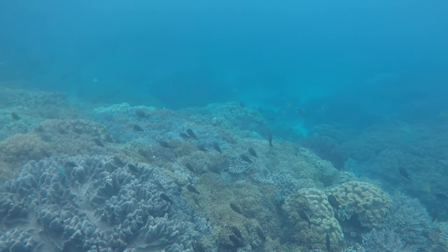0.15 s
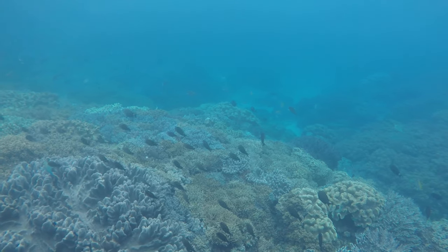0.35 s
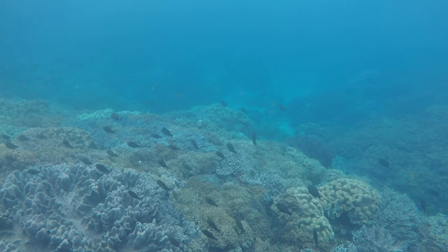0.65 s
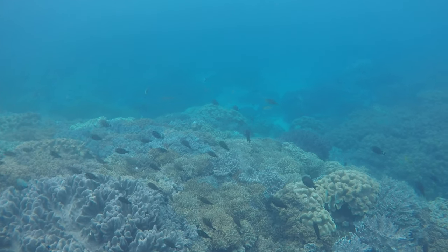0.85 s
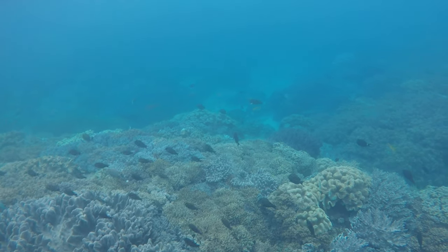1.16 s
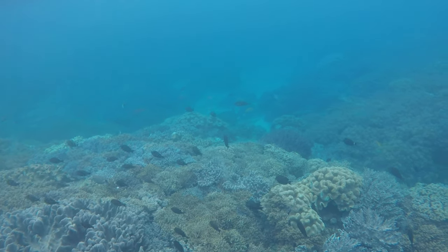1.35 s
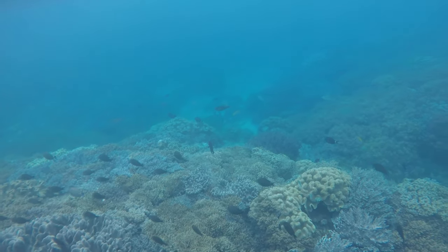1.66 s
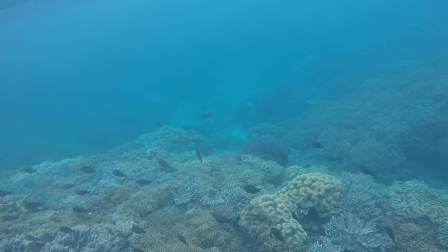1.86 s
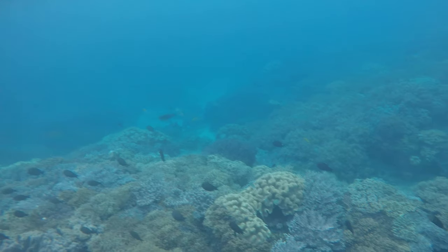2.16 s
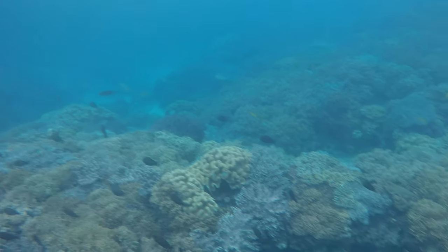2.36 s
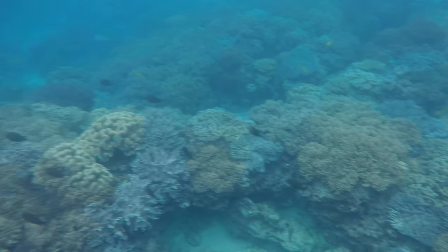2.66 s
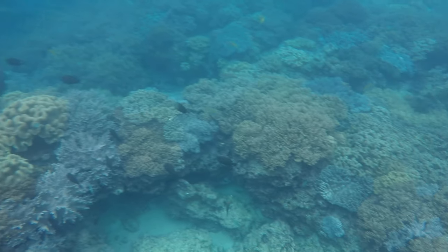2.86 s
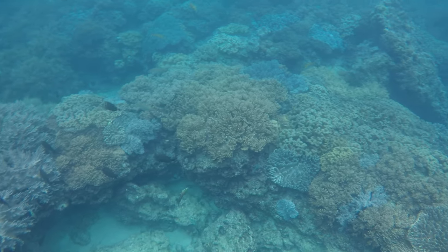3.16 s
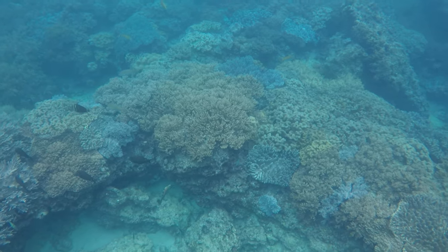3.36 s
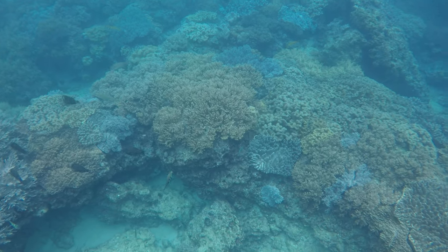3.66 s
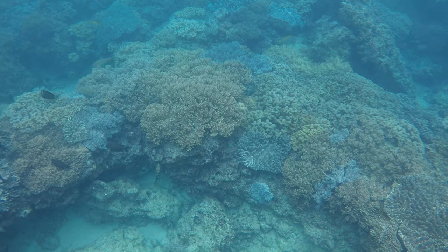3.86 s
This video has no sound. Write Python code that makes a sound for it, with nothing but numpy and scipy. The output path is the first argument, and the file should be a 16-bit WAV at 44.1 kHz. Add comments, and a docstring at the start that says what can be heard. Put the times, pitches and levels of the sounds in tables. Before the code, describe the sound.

Water knocks dully on an underwater camera housing above a coral reef. Quiet hiss, fine shrimp crackle and sharper ticks run throughout. A faint creak comes at 0.1 seconds, soft knocks and slosh around 0.6-0.8. Bass opens near 0.9; knocks, blips, thumps and fizz cluster at 1.1-1.3. After a calmer stretch, a clack at 2.28 precedes hard knocks at 2.35, 3.06 and 3.32, then creaks at 3.74 and 3.9.

```python
"""Four seconds under water by a coral reef, heard by two microphones in a waterproof camera housing.
From the start, shaped noise makes a hiss, far crackle, sloshing and surge rumble; near shrimp tick on top.
An early creak is made of tiny slips. The deep bass opens just before one second; then come strong knocks that
ring the housing, short pitched blips, low thumps and a run of quick knocks. Past two seconds a dull clack rings,
then the hardest knocks follow, with puffs of fizz in the wash. Two more creaks come near the end."""
import sys
import numpy as np
from scipy import signal
from scipy.fft import rfft, irfft
from scipy.io import wavfile

SR = 44100
rng = np.random.default_rng(int(sys.argv[2]) if len(sys.argv) > 2 else 0)


def bounce(signal):
    """Save signal as a 16-bit WAV file at the path given by the first command-line argument."""
    frames = np.transpose(np.atleast_2d(signal))
    limited = np.clip(frames, -1, 1)
    pcm = np.round(limited * 32767).astype(np.int16)
    wavfile.write(sys.argv[1], SR, pcm)


N = 176400
T = np.arange(N) / SR  # time in seconds
OPPOSITE = np.array([[1], [-1]])  # left and right move in opposite directions

# Snaps of near shrimp. Columns: t/s, peak level before balance/dB, relative low ring level/dB,
# relative bright ring level/dB, left minus right balance/dB
NEAR_SNAPS = [(0.2853, -16.5, -9, -3.5, 1), (0.5723, -37.5, 3, 1, 1), (0.585, -28.5, 5, 3, -4),
              (0.8923, -34.5, -14, 1, -2), (0.9338, -29, -15, 2, 1), (0.9784, -26, -12, 9, 0),
              (1.3914, -40, 0, -10.5, -14.5), (1.463, -34, -20, 3, 1), (1.527, -37, -4, -6, 1),
              (1.856, -25, -6.5, 1, 1), (1.8983, -32, -3, 3.5, 1), (2.085, -32.5, -4, -1, 1),
              (2.631, -32.5, -1, -8, 4), (2.6768, -34.5, 4, -7, 8.5), (2.8677, -28.5, 8, 11.5, 0.5),
              (2.994, -30, 1.5, 0.5, 1), (3.2045, -35, -2, -1, 2), (3.296, -23.5, 2.5, -0.5, 0),
              (3.3985, -32, -10, -2, 2), (3.413, -30, -1.5, 0.5, 1), (3.4456, -30.5, -13, -3, 2),
              (3.745, -35.5, -4, 1, 2), (3.7677, -31.5, 4, 5.5, 0), (3.9718, -26.5, 3, 0, 2)]
# The two groups of housing resonances that a snap rings. Columns: f/Hz, relative level/dB
SNAP_LOW_COLOUR = [(700, -62), (1350, -14), (1780, 8.5), (2200, -7), (2850, -4.5), (3700, -3),
                   (4400, -23.5), (9000, -68.5)]
SNAP_BRIGHT_COLOUR = [(1500, -20), (3500, -16), (4300, -12.5), (5250, 7.5), (6300, 2.5), (7100, 6),
                      (7900, -6), (10500, -21), (15000, -28)]
SNAP_LAG_S = 0.00045  # greatest delay between the microphones
SNAP_SCATTER_S, SNAP_SCATTER_DB = 0.0021, -13  # early scattering: time constant, starting level
REEF_ECHO_S, REEF_ECHO_DB = 0.005, -24  # longer, fainter scattering

# Ringing tones of one dull clack. Columns: f/Hz, time to fall by 60 dB/s, relative level/dB
CLACK_TONES = [(1786, 0.023, 5), (2170, .008, -8), (2800, 0.018, -6.5)]
CLACK_S, CLACK_DB, CLACK_PAN_DB = 2.283, -21, 5  # start, peak before balance, left minus right

# Knocks of water on the housing. Columns: t/s, peak level before balance/dB, push brightness f/Hz,
# rocking level relative to squeezing/dB, left minus right balance/dB
WATER_KNOCKS = [(0.079, -22.5, 560, 0.5, -3.5), (0.607, -25.5, 494, -4, -5), (0.622, -27, 450, -2.5, -3),
                (.665, -22, 445, -15, -5), (0.803, -17.5, 152, 7, 13), (1.146, -11.5, 323, 3.5, 2),
                (1.161, -14.5, 600, -6, 3.5), (1.195, -15, 130, -2.5, -5.5), (1.295, -21.5, 600, 5, 6.5),
                (2.3455, -7, 320, 5, 4.5), (2.439, -14, 770, 2, -1.5), (2.927, -15.5, 400, 7, 6),
                (3.0589, -6.5, 850, 0, 0), (3.213, -13.5, 392, 0, -2.5), (3.319, -5, 152, 0.5, 3.5)]
KNOCK_RATTLE_S, KNOCK_RATTLE_DB = 0.007, -32  # time constant, starting level against the first contact
# Housing tones: squeezing moves both microphones together, rocking moves them oppositely.
# Columns: f/Hz, time to fall by 60 dB/s, relative level/dB
SQUEEZE_TONES = [(168, 0.025, 3), (197, 0.016, 9.5), (399, 0.026, 1), (600, 0.015, -10), (1164, 0.03, -9),
                 (1800, 0.0043, -0.5)]
ROCK_TONES = [(177, 0.024, 5), (576, 0.026, 5.5), (722, 0.011, 5), (920, 0.02, -2), (1060, 0.022, -1),
              (1336, 0.039, -4)]

# Short pitched blips, some ringing with a knock, some perhaps bubbles. Columns: t/s, f/Hz, peak level/dB
TONE_BLIPS = [(1.127, 430, -13), (1.144, 453, -20), (1.162, 940, -24), (2.344, 543, -15.5),
              (2.437, 567, -23), (2.928, 580, -27), (3.209, 875, -31)]
BLIP_ATTACK_S, BLIP_DECAY_S, BLIP_SQUEEZE = 0.0025, 0.0063, 0.31  # last: share of squeezing as a gain

# Stick-slip creaks, probably the grip, and at 1.218 s a run of quick knocks on the housing.
# Columns: t/s, length/s, contact rate at the start/Hz, contact rate at the end/Hz, peak level/dB
CONTACT_RUNS = [(.1, 0.12, 221, 115, -29), (0.789, 0.094, 115, 320, -31.5), (1.218, .12, 80, 45, -24.5),
                (3.738, 0.105, 60, 34, -26), (3.909, 0.095, 51, 98, -28)]
CONTACT_HZ, CONTACT_ROCK_DB = 400, -0.5  # brightness of each contact, rocking against squeezing
CONTACT_JITTER, CONTACT_SPREAD_DB = 0.035, 3  # spread of timing (log ratio) and of strength

# Thumps of moving water. Columns: t/s, peak level/dB, f/Hz
WATER_THUMPS = [(1.106, -17.5, 40), (1.132, -23.5, 52.4), (1.975, -28, 40.7), (2.347, -27, 50.7),
                (2.619, -32, 43.4), (3.3106, -19, 59), (3.328, -18.5, 43.6)]
THUMP_ATTACK_S, THUMP_DECAY_S = 0.0055, 0.016

# Rise and fall of water sloshing past the housing. Columns: t/s, relative level/dB
SLOSH_LEVEL = [(0, -57), (.085, -48), (.21, -53.5), (.28, -56.5), (.39, -50), (.56, -55), (.605, -41),
               (.69, -40), (.745, -54.5), (.85, -46.5), (.97, -44), (1.07, -47), (1.16, -32), (1.21, -42.5),
               (1.37, -57), (1.6, -57), (1.8, -50), (1.9, -55.5), (2.01, -49), (2.14, -59), (2.25, -48.5),
               (2.4, -56), (2.46, -48), (2.58, -47.5), (2.72, -55.5), (2.89, -48.5), (2.94, -35),
               (3.01, -53), (3.075, -34.5), (3.12, -44.5), (3.2, -40), (3.26, -48.5), (3.32, -38.5),
               (3.38, -55), (3.71, -55.5), (3.77, -45.5), (3.89, -56), (4, -44)]
# Tone colour of the squeezing and rocking parts of the slosh. Columns: f/Hz, relative level/dB
SLOSH_SQUEEZE_COLOUR = [(90, -38), (125, -2.5), (170, 3.5), (250, 2), (420, -3.5), (520, -7.5),
                        (750, -16.5), (1200, -19.5), (1800, -30), (9000, -62.5)]
SLOSH_ROCK_COLOUR = [(90, -19), (160, 3), (260, -3), (380, -10), (520, -3), (700, -6.5), (980, -7.5),
                     (1200, -13.5), (1800, -26.5), (9000, -75)]
SLOSH_PER_S, SLOSH_SPREAD_DB = 900, 2.5
SQUEEZE_DB, ROCK_DB = 2.5, 7.5  # levels of the two parts before the rise and fall

# Puffs of fine fizz. Columns: t of the middle/s, swell width (standard deviation)/s,
# level before the top is cut/dB, top f/Hz
FIZZ_PUFFS = [(0.66, 0.019, -51, 1840), (0.869, 0.0068, -43, 2450), (0.96, 0.026, -52.5, 2540),
              (1.154, 0.022, -42.5, 2900), (2.014, 0.04, -48, 2400), (2.57, 0.022, -42.5, 1280),
              (3.076, 0.012, -38, 1880), (3.164, 0.027, -47, 2600), (3.322, 0.0044, -38, 3200)]
# Tone colour of the fizz. Columns: f/Hz, relative level/dB
FIZZ_TONE = [(500, -12.5), (900, -4), (1300, 4.5), (1800, -2.5), (2800, -0.5), (4200, -13)]
FIZZ_PER_S, FIZZ_SPREAD_DB = 700, -1

# Tone colour of the far shrimp and of the hiss they merge into. Columns: f/Hz, relative level/dB
FAR_CRACKLE_COLOUR = [(900, -28), (1750, -2.5), (2500, -8), (4300, -17.5), (5250, 0.5), (6300, -3.5),
                      (7000, -2), (8000, -12), (15000, -23)]
FAR_HISS_COLOUR = [(90, -34), (150, 2.5), (400, 9), (800, 6.5), (1800, 3), (3000, 0.5), (4300, -2.5),
                   (7000, 1), (7900, -2), (10000, -3.5), (12500, -14), (15000, -30)]
CRACKLE_PER_S, CRACKLE_SPREAD_DB = 160, 4.5
CRACKLE_DB, HISS_DB = -57.5, -54.5

# Rise and fall of the low surge rumble. Columns: t/s, relative level/dB
RUMBLE_LEVEL = [(0, -38), (.92, -49), (1.07, -47), (1.14, -30), (1.25, -39), (1.45, -46.5), (1.7, -41.5),
                (2.02, -37), (2.13, -44), (2.26, -39), (2.5, -41.5), (2.65, -39), (2.85, -43.5),
                (3.45, -45), (3.88, -47.5), (4, -35)]
# Tone colour of the rumble. Columns: f/Hz, relative level/dB
RUMBLE_TONE = [(12, -14.5), (25, -3), (50, 3), (75, -2), (110, -8), (170, -16), (300, -28), (700, -68)]
RUMBLE_SIDE_DB = -7.5  # gain of the part that differs between left and right

LOW_CUT_HZ, BASS_OPENS_S, BASS_FADE_S = 145.3, 0.874, 0.083  # the low cut, when it lets go, how long it takes
TOP_HZ = 15100  # top of the treble


def undb(db):
    """Turn decibels into a gain."""
    return 10 ** (np.asarray(db) / 20)


def level(x, db):
    """Scale a sound to a chosen rms (root of average power) level."""
    return x * undb(db) / np.sqrt(np.mean(x ** 2))


def curve(rows):
    """Draw a gain over time through points of time and decibels."""
    times, levels = np.array(rows).T
    return undb(np.interp(T, times, levels))


def colour(x, rows):
    """Filter a sound through points of frequency and decibels, with no sound before its cause."""
    hz, db = np.array(rows).T
    n = x.shape[-1]
    f = np.maximum(np.fft.rfftfreq(n, 1 / SR), 1)
    gain_db = np.interp(np.log(f), np.log(hz), db)
    # Folding the cepstrum (spectrum of the log gain) gives a minimum-phase filter.
    cepstrum = irfft(np.log(undb(gain_db)), n)
    cepstrum[1:n // 2] *= 2
    cepstrum[n // 2 + 1:] = 0
    return irfft(rfft(x) * np.exp(rfft(cepstrum)), n)


def grains(per_s, spread_db):
    """Scatter tiny clicks at random times, with random sizes and signs."""
    size = undb(spread_db * np.minimum(rng.exponential(size=N), 5))
    happens = rng.random(N) < per_s / SR
    return happens * size * rng.choice([-1, 1], N)


def ring(push, modes):
    """Ring a set of fading sine tones, as a solid body does after a short push."""
    t = T[:len(push)]
    tone = np.zeros(len(push))
    for hz, t60, db in modes:
        fade = np.exp(-np.log(1000) * t / t60)
        tone += undb(db) * np.sin(2 * np.pi * hz * t) * fade
    return signal.fftconvolve(push, tone)[:len(push)]


def add(out, x, s, db, pan_db):
    """Mix in a sound at a time, with a peak level and a left-right balance."""
    i = max(int(s * SR), 0)
    x = x / x.std(axis=-1, keepdims=True)  # make both sides equally strong first
    x = x / np.abs(x).max() * undb(db + OPPOSITE * pan_db / 2)
    out[:, i:i + x.shape[1]] += x[:, :N - i]


def near_shrimp(size=2048):
    """Each snap is a spike, scattered by the coral, that rings the housing and reaches one microphone first."""
    out, t = np.zeros((2, N)), T[:size]
    early = undb(SNAP_SCATTER_DB) * np.exp(-t / SNAP_SCATTER_S)
    echo = undb(REEF_ECHO_DB) * np.exp(-t / REEF_ECHO_S)
    for s, db, low_db, bright_db, pan_db in NEAR_SNAPS:
        pushes = (t == 0) + (early + echo) * rng.standard_normal((2, size))
        # Each microphone gets its own small delay.
        pushes = np.array([np.roll(p, int(rng.random() * SNAP_LAG_S * SR)) for p in pushes])
        low_ring = level(colour(pushes, SNAP_LOW_COLOUR), low_db)
        bright_ring = level(colour(pushes, SNAP_BRIGHT_COLOUR), bright_db)
        add(out, low_ring + bright_ring, s, db, pan_db)
    return out


def clack(size=2048):
    """One hard contact, perhaps a fish biting coral, rings a few tones and reaches the right side later."""
    out = np.zeros((2, N))
    contact = 1.0 * (T[:size] == 0)
    left = ring(contact, CLACK_TONES)
    right = np.roll(left, int(SNAP_LAG_S * SR))
    add(out, np.array([left, right]), CLACK_S, CLACK_DB, CLACK_PAN_DB)
    return out


def housing(contact, hz, rock_db):
    """A soft contact squeezes and rocks the housing; a longer push sounds duller."""
    push = signal.lfilter(*signal.butter(2, hz, fs=SR), contact)
    push = signal.lfilter(*signal.butter(1, hz / 2, "high", fs=SR), push)
    squeeze = ring(push, SQUEEZE_TONES)
    rock = undb(rock_db) * ring(push, ROCK_TONES)
    return squeeze + OPPOSITE * rock


def knocks(size=4096):
    """Single pushes of water, each with a brief noisy rattle, ring the housing."""
    out, t = np.zeros((2, N)), T[:size]
    rattle_fade = undb(KNOCK_RATTLE_DB) * np.exp(-t / KNOCK_RATTLE_S)
    for s, db, hz, rock_db, pan_db in WATER_KNOCKS:
        contact = (t == 0) + rattle_fade * rng.standard_normal(size)
        add(out, housing(contact, hz, rock_db), s, db, pan_db)
    return out


def tone_blips(size=4096):
    """A tone swells and dies within a few cycles, mostly opposite at the two microphones."""
    out, t = np.zeros((2, N)), T[:size]
    swell = (1 - np.exp(-t / BLIP_ATTACK_S)) * np.exp(-t / BLIP_DECAY_S)
    for s, hz, db in TONE_BLIPS:
        rock = np.sin(2 * np.pi * hz * t) * swell
        squeeze = np.cos(2 * np.pi * hz * t) * swell
        add(out, OPPOSITE * rock + BLIP_SQUEEZE * squeeze, s, db, 0)
    return out


def contact_runs(size=16384):
    """Runs of small contacts at a gliding rate ring the housing: creaking slips or quick knocks."""
    out = np.zeros((2, N))
    for s, length, first, last, db in CONTACT_RUNS:
        contacts, at = np.zeros(size), 0
        for jitter, strength in rng.standard_normal((64, 2)):  # at most 64 contacts
            if at < min(length, size / SR):
                contacts[int(at * SR)] = undb(CONTACT_SPREAD_DB * strength)
                per_s = np.interp(at, [0, length], [first, last])
                at += np.exp(CONTACT_JITTER * jitter) / per_s
        add(out, housing(contacts, CONTACT_HZ, CONTACT_ROCK_DB), s, db, 0)
    return out


def thumps(size=8192):
    """A pressure swing of a cycle or two, the same at both microphones."""
    out, t = np.zeros((2, N)), T[:size]
    swell = (1 - np.exp(-t / THUMP_ATTACK_S)) * np.exp(-t / THUMP_DECAY_S)
    for s, db, hz in WATER_THUMPS:
        add(out, np.sin(2 * np.pi * hz * t) * swell, s, db, 0)
    return out


def slosh():
    """Dense little eddies patter on the housing, squeezing and rocking it."""
    squeeze = level(colour(grains(SLOSH_PER_S, SLOSH_SPREAD_DB), SLOSH_SQUEEZE_COLOUR), SQUEEZE_DB)
    rock = level(colour(grains(SLOSH_PER_S, SLOSH_SPREAD_DB), SLOSH_ROCK_COLOUR), ROCK_DB)
    return curve(SLOSH_LEVEL) * (squeeze + OPPOSITE * rock)


def fizz():
    """Short swells of fine clicks; the smallest bubbles of each puff set its top frequency."""
    out = np.zeros((2, N))
    sides = [colour(grains(FIZZ_PER_S, FIZZ_SPREAD_DB), FIZZ_TONE) for _ in range(2)]
    bed = level(np.array(sides), 0)
    for s, width, db, top_hz in FIZZ_PUFFS:
        swell = undb(db) * np.exp(-((T - s) / width) ** 2 / 2)
        top_cut = signal.butter(10, top_hz, fs=SR, output="sos")
        out += swell * signal.sosfilt(top_cut, bed)
    return out


def far_shrimp():
    """Many faint snaps a second, each from its own direction, over a smooth hiss."""
    snaps, pushes = grains(CRACKLE_PER_S, CRACKLE_SPREAD_DB), np.zeros((2, N))
    at = np.flatnonzero(snaps)
    # Each snap reaches each microphone with its own small delay.
    for push, lag in zip(pushes, rng.random((2, N))):
        delay = (lag[at] * SNAP_LAG_S * SR).astype(int)
        push[(at + delay) % N] = snaps[at]
    t = T[:1024]
    scatter_fade = undb(SNAP_SCATTER_DB) * np.exp(-t / SNAP_SCATTER_S)
    scatter = (t == 0) + scatter_fade * rng.standard_normal((2, len(t)))
    # Spread the power of each snap over time, then let it shape noise.
    power = np.maximum(signal.fftconvolve(pushes ** 2, scatter ** 2, axes=-1)[:, :N], 0)
    crackle = colour(np.sqrt(power) * rng.standard_normal((2, N)), FAR_CRACKLE_COLOUR)
    hiss = colour(rng.standard_normal((2, N)), FAR_HISS_COLOUR)
    return level(crackle, CRACKLE_DB) + level(hiss, HISS_DB)


def rumble():
    """Slow pressure changes of the surge, partly alike on both sides, made from low noise."""
    mid, side = level(colour(rng.standard_normal((2, N)), RUMBLE_TONE), 0)
    return curve(RUMBLE_LEVEL) * (mid + OPPOSITE * undb(RUMBLE_SIDE_DB) * side)


def scene():
    """Add shrimp, housing and moving water together."""
    sharp = near_shrimp() + clack()
    on_housing = knocks() + tone_blips() + contact_runs()
    water = thumps() + slosh() + fizz()
    background = far_shrimp() + rumble()
    return sharp + on_housing + water + background


def record(dry):
    """The camera's low cut lets go after the first moments; the top of the treble is always cut."""
    low_cut = signal.butter(10, LOW_CUT_HZ, "high", fs=SR, output="sos")
    thin = signal.sosfilt(low_cut, dry)
    opened = np.clip((T - BASS_OPENS_S) / BASS_FADE_S, 0, 1)
    full = thin + opened * (dry - thin)
    top_cut = signal.ellip(8, 0.2, 70, TOP_HZ, fs=SR, output="sos")
    return signal.sosfilt(top_cut, full)


dry = scene()
out = record(dry)
bounce(out)
```